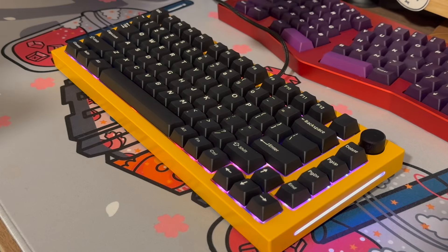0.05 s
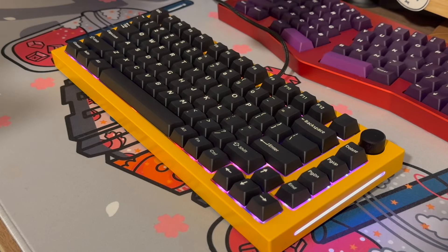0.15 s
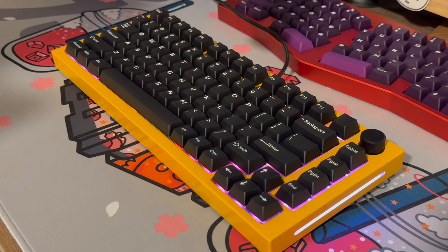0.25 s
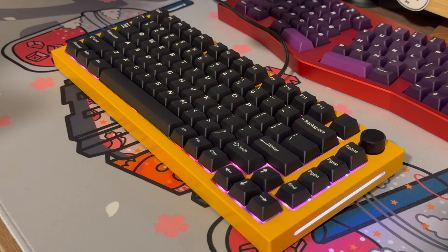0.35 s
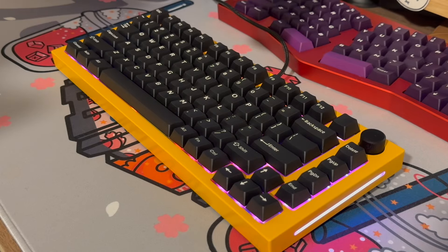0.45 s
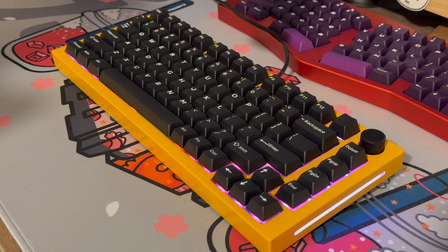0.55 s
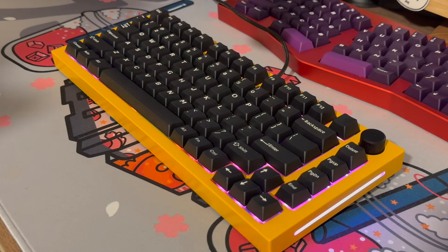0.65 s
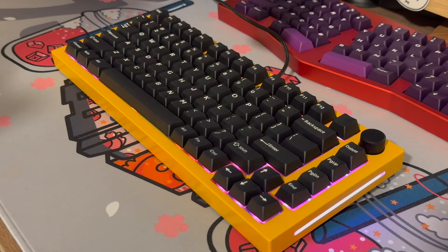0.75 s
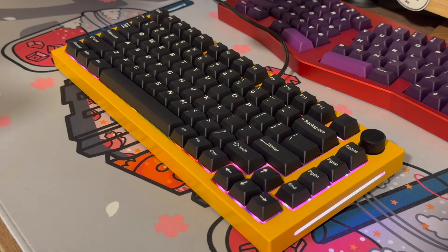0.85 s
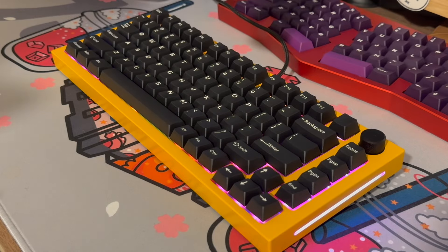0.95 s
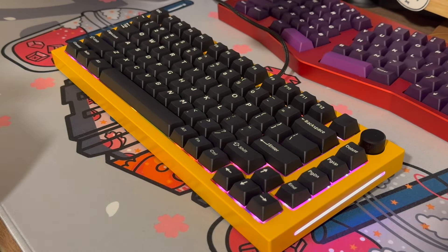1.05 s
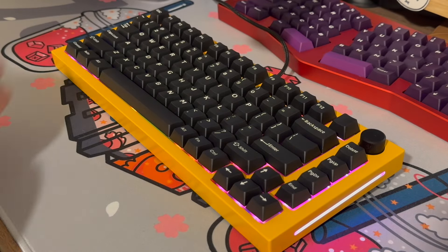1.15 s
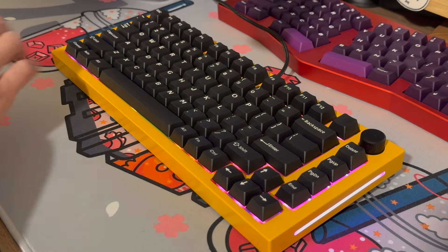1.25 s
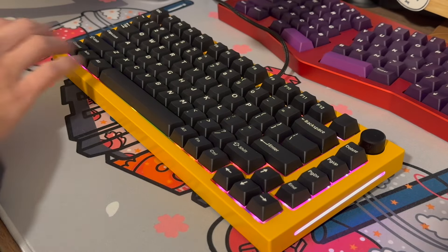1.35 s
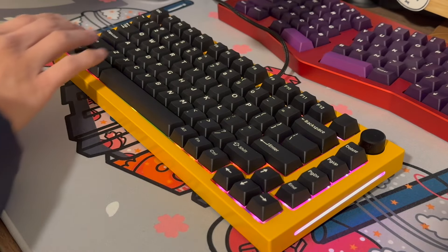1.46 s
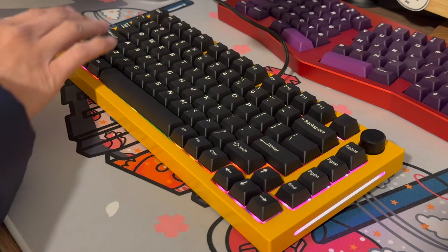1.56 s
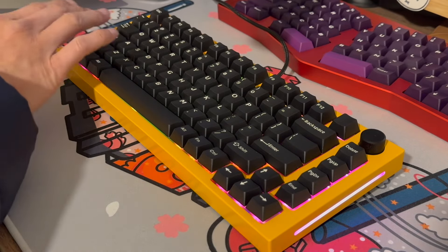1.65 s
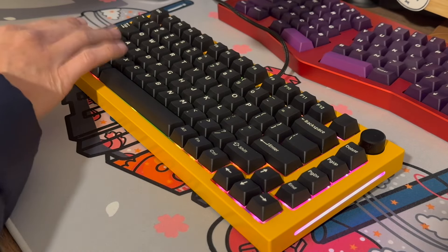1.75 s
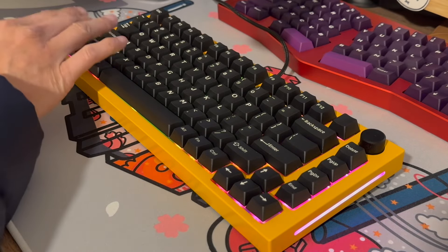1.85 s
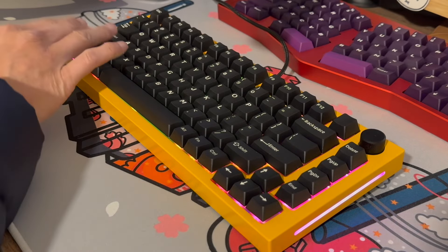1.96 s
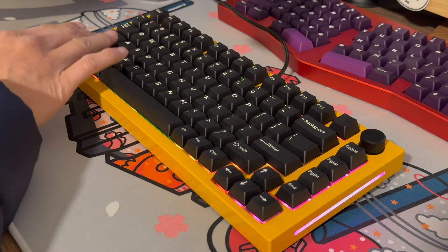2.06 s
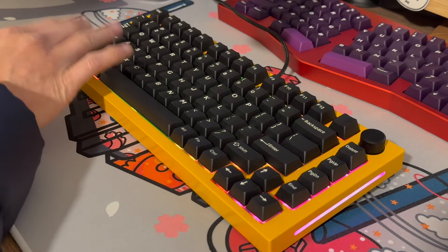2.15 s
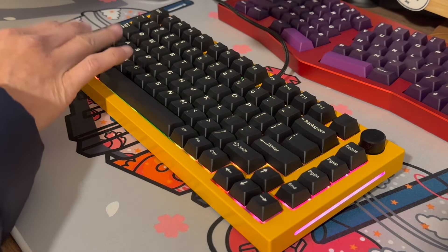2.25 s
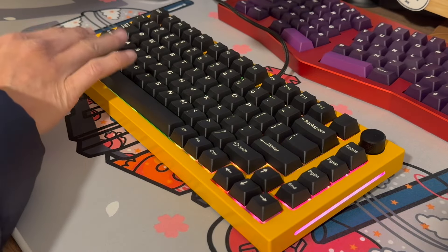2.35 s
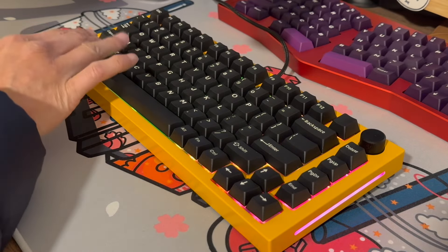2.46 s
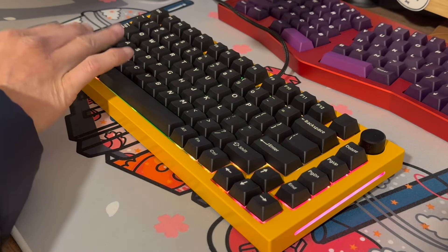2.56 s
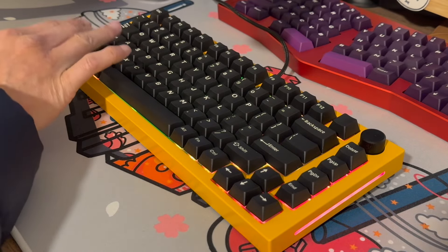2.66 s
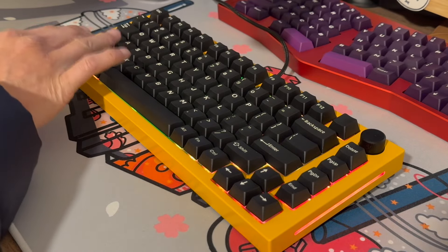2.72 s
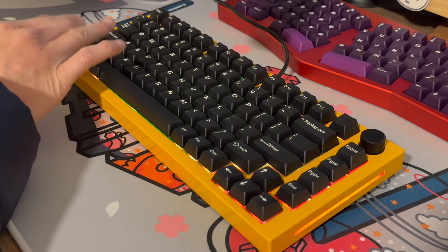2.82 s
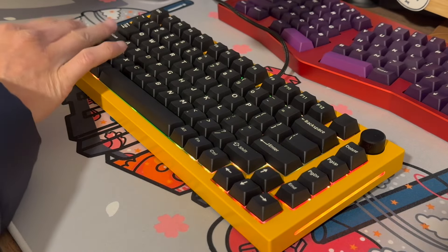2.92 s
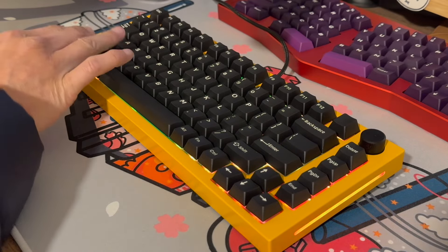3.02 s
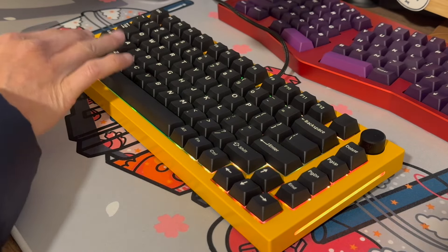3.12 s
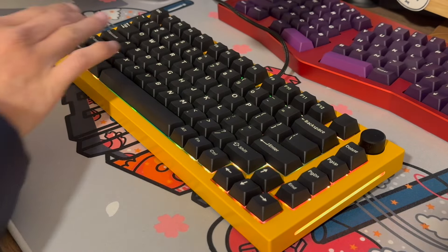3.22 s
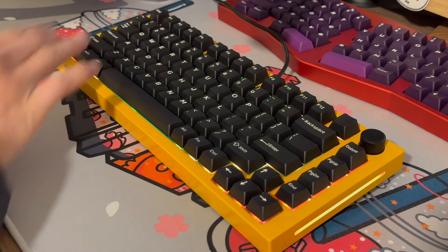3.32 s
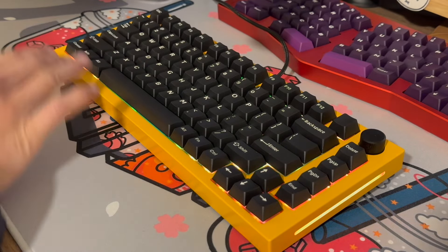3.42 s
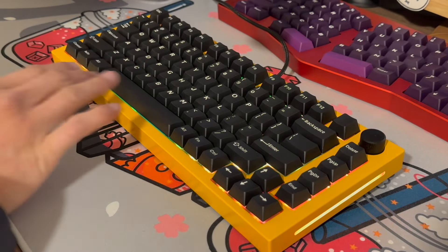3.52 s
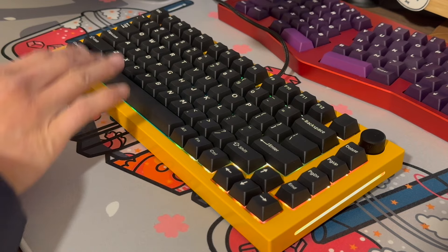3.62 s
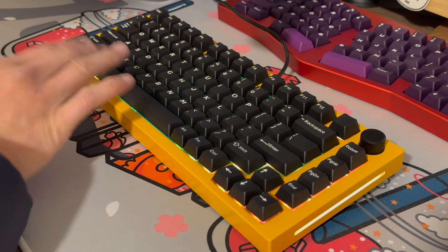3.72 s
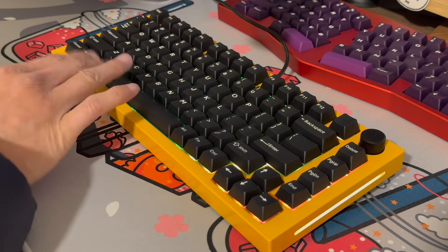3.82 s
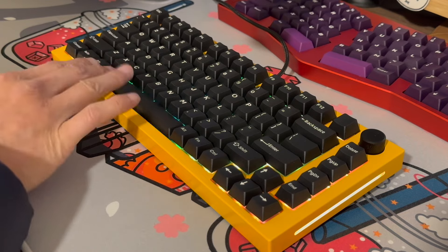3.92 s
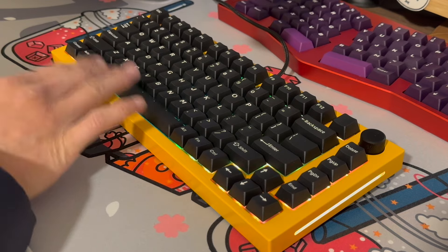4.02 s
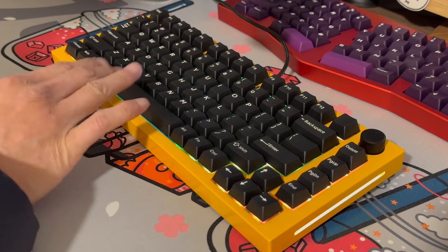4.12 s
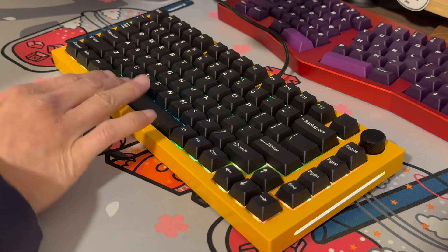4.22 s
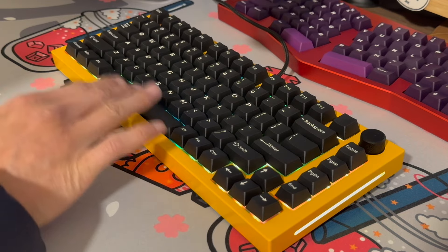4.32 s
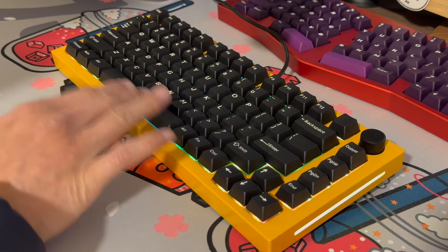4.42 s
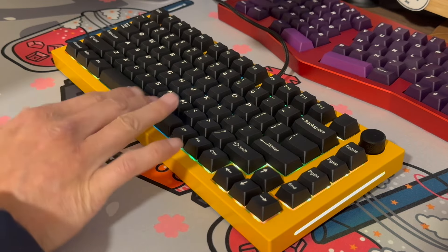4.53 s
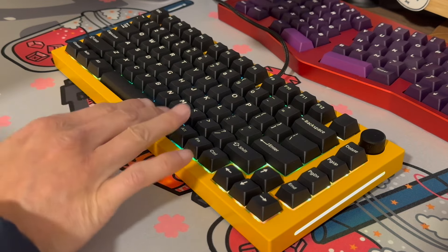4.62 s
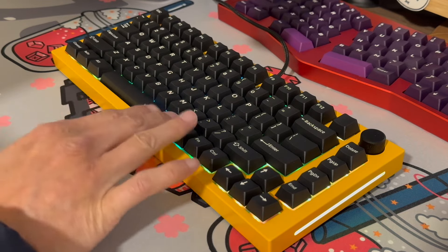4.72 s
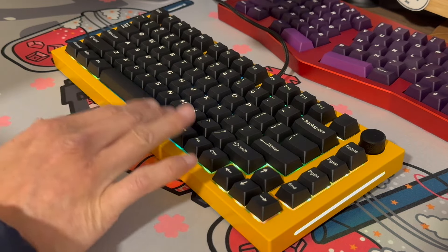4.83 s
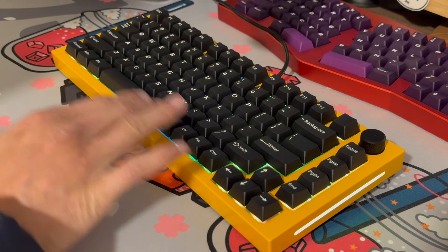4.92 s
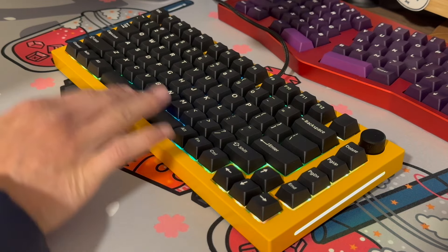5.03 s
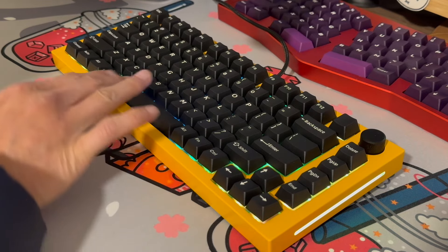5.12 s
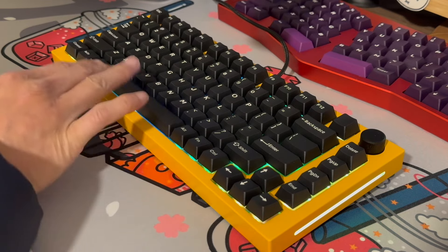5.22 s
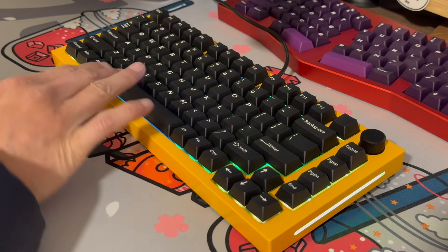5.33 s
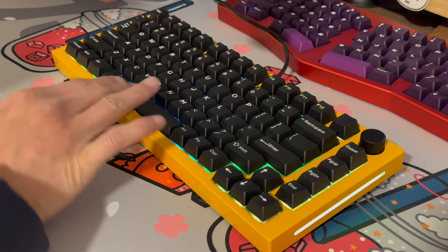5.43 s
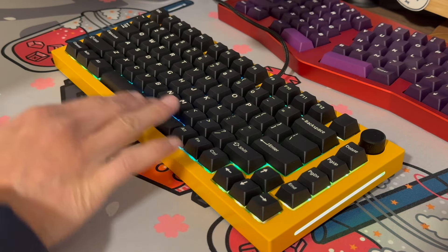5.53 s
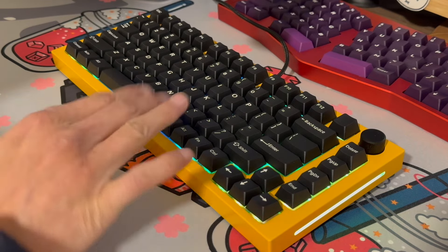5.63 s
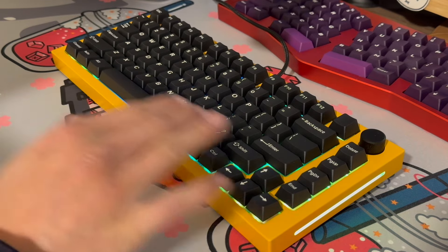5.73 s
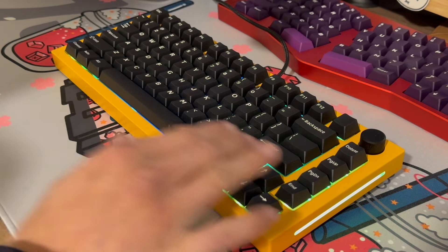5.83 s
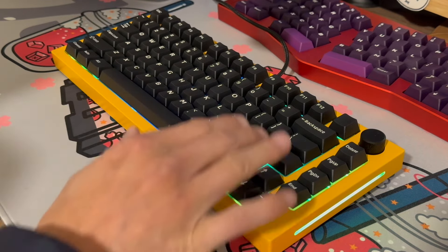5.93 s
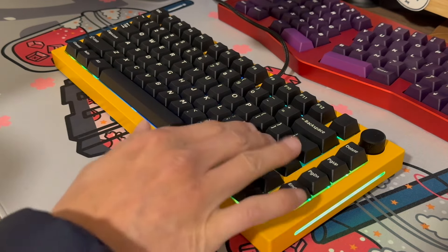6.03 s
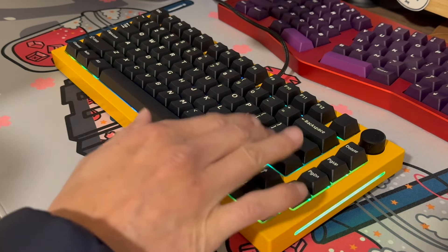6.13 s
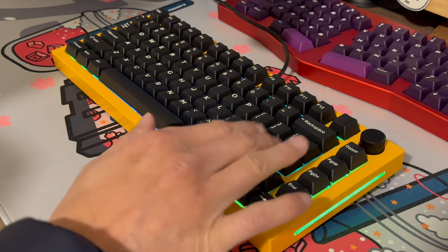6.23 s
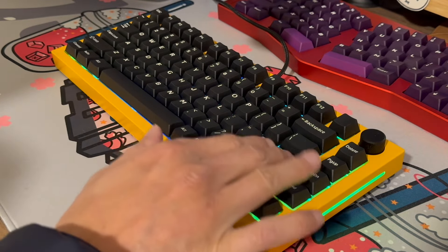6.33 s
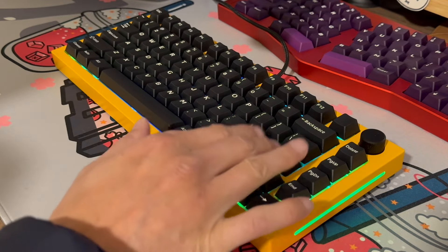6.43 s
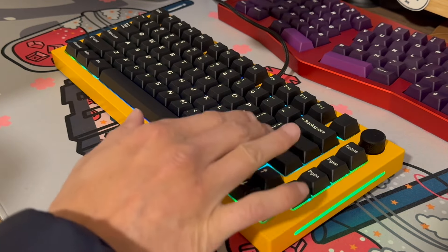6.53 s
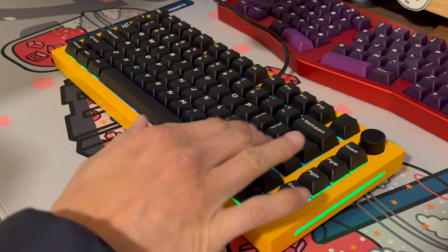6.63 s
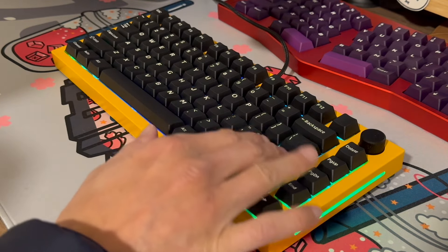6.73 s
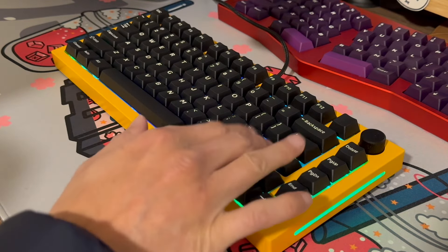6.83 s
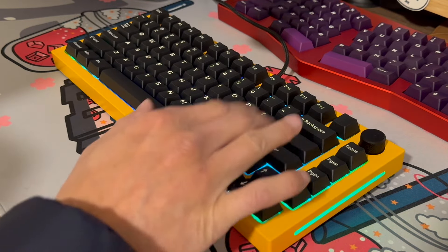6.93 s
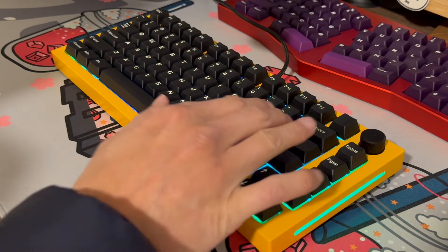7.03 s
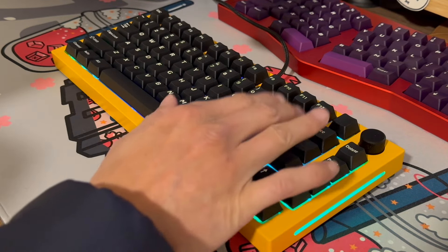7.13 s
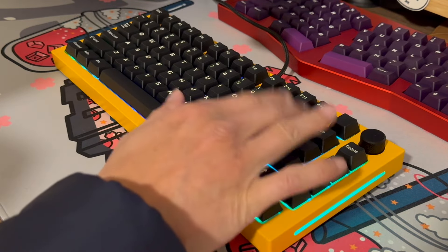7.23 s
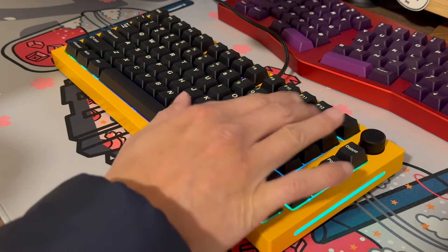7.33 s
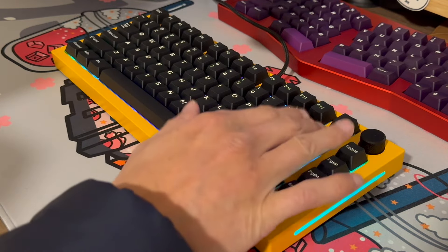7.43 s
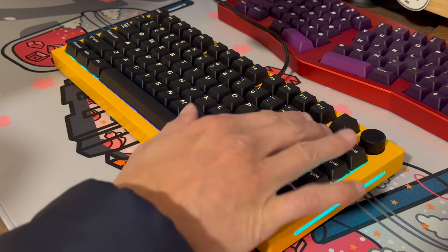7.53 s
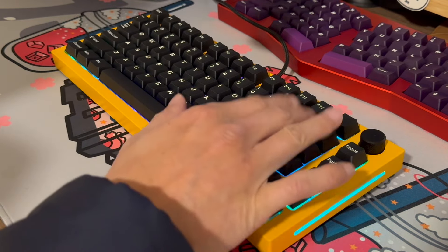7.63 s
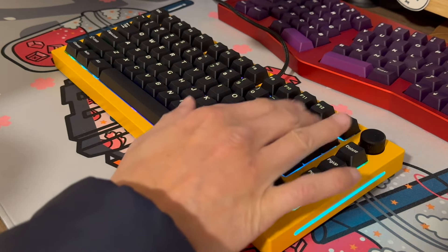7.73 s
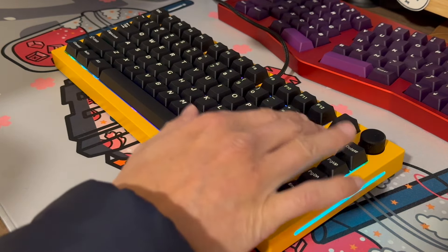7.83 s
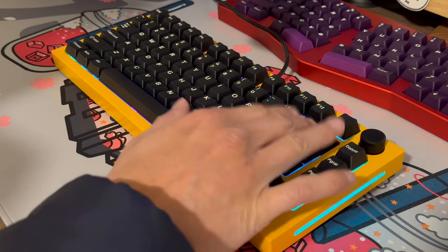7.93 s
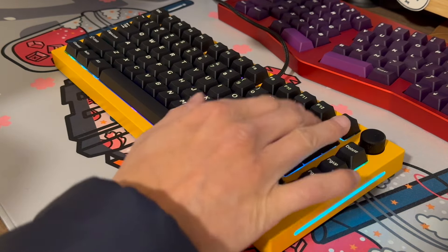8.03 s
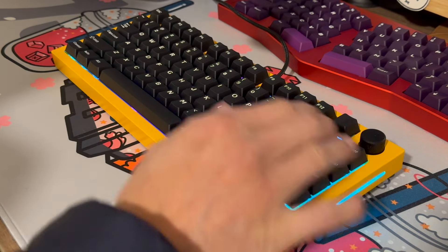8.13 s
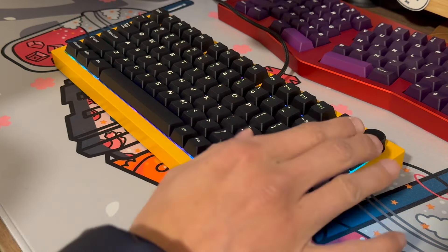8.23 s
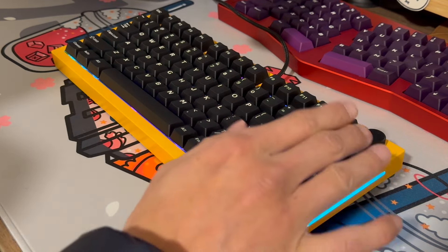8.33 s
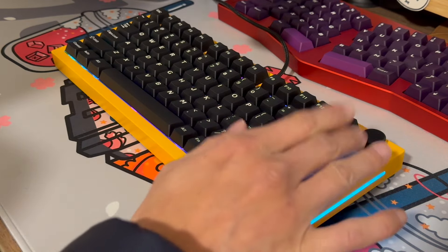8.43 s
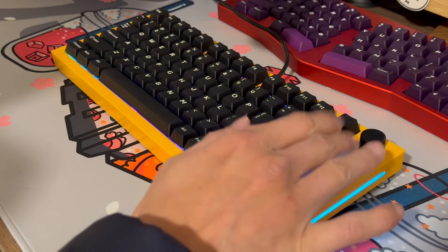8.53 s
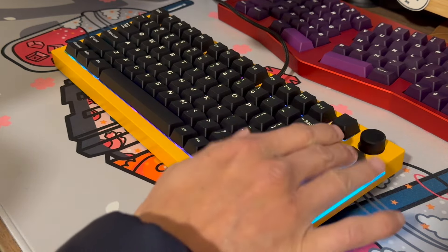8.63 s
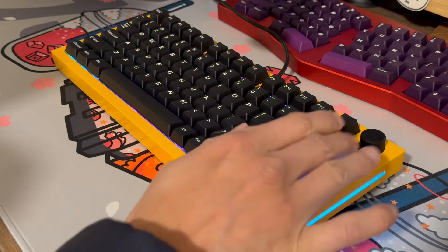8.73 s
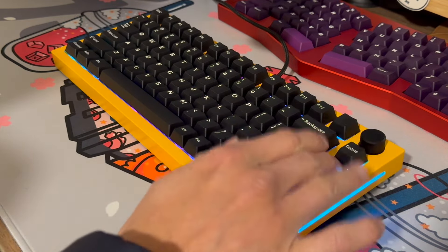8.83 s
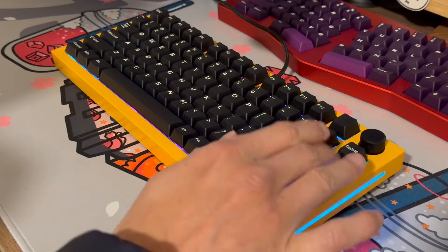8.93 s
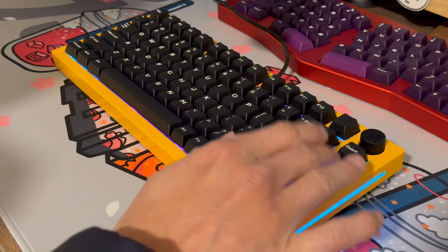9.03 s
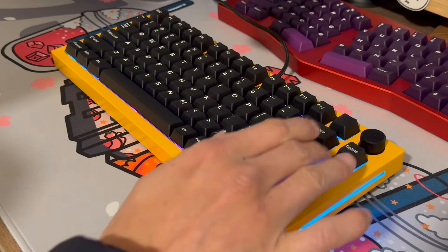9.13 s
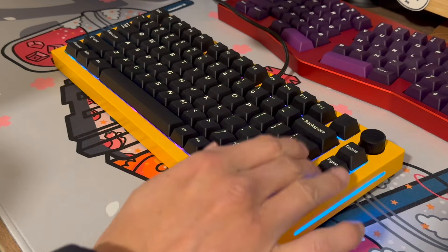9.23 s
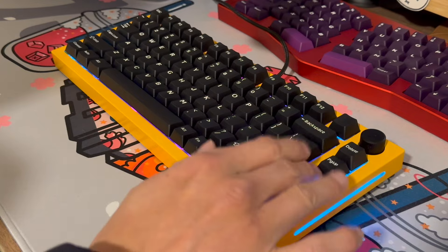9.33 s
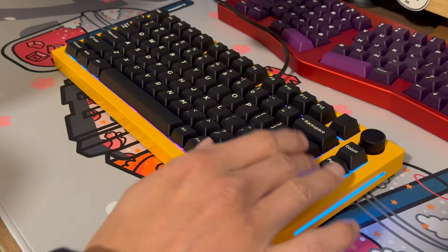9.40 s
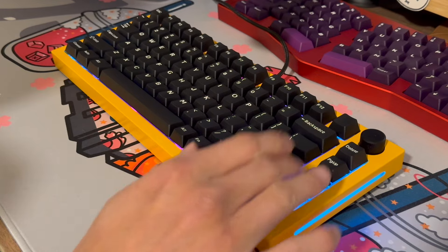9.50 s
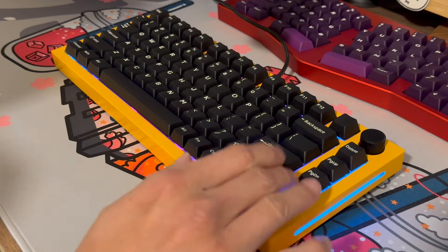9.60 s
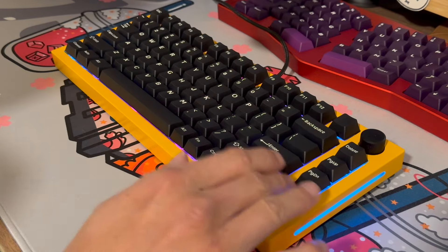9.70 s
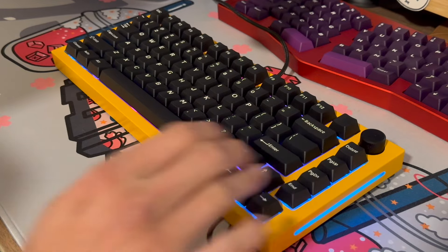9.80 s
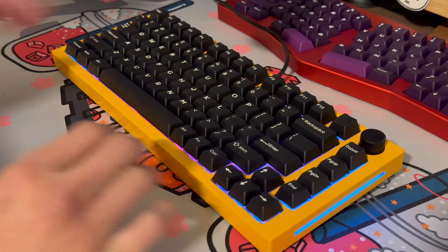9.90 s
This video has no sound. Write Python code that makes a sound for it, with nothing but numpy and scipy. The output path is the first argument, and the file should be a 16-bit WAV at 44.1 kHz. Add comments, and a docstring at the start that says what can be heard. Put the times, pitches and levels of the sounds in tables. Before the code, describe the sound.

Close mechanical keyboard clacks come in rapid runs, one key repeated at a time, with short pauses and a faint sleeve rustle.

```python
"""At a desk in a small, quiet room, one hand taps a mechanical keyboard in quick bursts, key by key:
a left-hand key, space bar, shift, enter, backspace and a small key. Each key clacks down on the plate
that holds it, then springs back against its top stop, and the desk booms faintly.
A sleeve rustles between bursts, and the room answers with a short flutter of echoes.
The microphone is close, so left and right sound almost the same."""
import sys
import numpy as np
from scipy import signal
from scipy.fft import rfft, irfft, next_fast_len
from scipy.io import wavfile
from scipy.ndimage import uniform_filter1d, map_coordinates

SR = 44100
rng = np.random.default_rng(int(sys.argv[2]) if len(sys.argv) > 2 else 0)


def unload_wav(signal):
    """Save mono or channel-first audio to the path in sys.argv[1] as 16-bit WAV at rate SR, clipped to [-1, 1]."""
    wavfile.write(
        sys.argv[1],
        SR,
        np.round(np.clip(np.atleast_2d(signal).T, -1, 1) * 32767).astype(np.int16),
    )


N = 439236
SIZE = 4096  # samples in one short sound, such as a clack
HZ, T = np.fft.rfftfreq(SIZE, 1 / SR), np.arange(SIZE) / SR  # its frequencies and times

# tone of three noises (room air, rubbing cloth, skin on a keycap): f/Hz, level/dB
AIR_TONE = [(15, -9), (30, -4), (45, -8.5), (60, -26.5), (80, -28.5), (110, -20.5), (260, -28.5),
            (500, -28.5), (950, -34.5), (1700, -42.5), (9000, -45), (13500, -46), (16000, -73)]
CLOTH_TONE = [(240, -34), (400, -3), (518, -5), (558, -6), (854, -1.5), (964, 1), (1390, -4), (4130, -6.5),
              (9090, -14.5), (15000, -26.5)]
SKIN_TONE = [(500, -19.5), (2000, -10), (4000, -6), (5500, 4.5), (6800, -11.5), (8600, -6), (10200, -2),
             (12000, -12.5), (16000, -29)]
# echoes from hard surfaces nearby: delay/s, level/dB
NEAR_ECHOES = [(0.0122, -27), (0.0126, -35.5), (0.0156, -45), (0.02, -41.5), (0.0242, -39), (0.0333, -41),
               (0.036, -39)]
# how long the room rings (t60 is the time to fade by 60 dB): f/Hz, t60/s
ROOM_DECAY = [(150, 0.33), (1000, 0.42), (3000, 0.37), (6000, 0.3), (14000, 0.54)]
# tone of the room's answer: f/Hz, level/dB
WALL_TONE = [(120, 0), (350, 7), (800, 4), (1300, -0.5), (2200, -1.5), (3200, 1), (4200, 4), (6000, 3),
             (12000, 0)]
# the sleeve brushing along as the hand moves: peak t/s, level/dB, rise/s, fall/s
SLEEVE_BRUSHES = [(.68, -72, 0.16, .4), (1.05, -66.5, 0.32, 0.29), (1.5, -66.5, 0.19, 0.19),
                  (3.37, -66.5, 0.047, 0.15), (4.1, -69, 0.31, 1), (5.87, -70.5, .3, 1.4),
                  (7.08, -73, 0.22, 1.3), (8.12, -64, 0.16, 0.1), (9.86, -66.5, 0.26, .4)]
# soft knocks of arm and fingers on desk and case: t/s, level/dB, f/Hz, t60/s
ARM_KNOCKS = [(1.233, -47, 176, 0.1), (1.52, -44, 1800, .006), (1.549, -42, 2390, 0.0051),
              (3.551, -35, 620, 0.0056), (5.789, -62, 260, 0.091)]
# low notes of desk and case: f/Hz, t60/s, then one level/dB for each key in KEYS
DESK_NOTES = [(26, 0.4, -57.5, -66.5, -57.5, -54, -53, -51), (36.2, 1.0, -57, -56, -54, -52, -50.5, -61),
              (70.9, 0.71, -55.5, -54, -60, -59, -67.5, -64),
              (108.1, .65, -72, -72.5, -66, -66.5, -64.5, -60.5),
              (138, 0.084, -67, -52.5, -75, -66, -76, -76),
              (251.3, 0.076, -65, -47.5, -56, -55, -69.5, -68)]
# fingers skidding along the space bar: start t/s, end t/s, level/dB
SPACE_SKIDS = [(4.93, 5.015, -63), (5.062, 5.143, -63), (5.304, 5.403, -62.5), (5.431, 5.537, -61)]
# broad tone of each key: f/Hz, press level/dB, release level/dB
LEFT_BODY = [(130, -16, -11.5), (260, -25, -18), (410, -46, -29), (843, -26, -21), (1264, -2, -0.5),
             (2205, -1, 0), (3290, -13, -3.5), (6330, -25, -19.5), (10300, -38.5, -30),
             (15500, -63.5, -54.5)]
SPACE_BODY = [(130, -17.5, -38), (260, -15.5, -17.5), (400, -21, -20), (778, -20.5, -8),
              (1362, -13.5, -13.5), (2285, 1, 0), (3686, -14, -19), (6890, -34.5, -38.5),
              (10480, -46.5, -36.5), (15200, -63, -66.5)]
SHIFT_BODY = [(130, -25, -30), (260, -36.5, -35), (372, -32, -40), (852, -14.5, -23.5), (1284, -1.5, -25),
              (2246, -5.5, 3), (3440, -25, -26.5), (6450, -35.5, -31.5), (10100, -39.5, -43.5),
              (15400, -69, -63.5)]
ENTER_BODY = [(143, -9.5, -10), (260, -21.5, -7), (356, -26.5, -15.5), (790, -8, -6), (1310, -1, 1.5),
              (2030, 3, -3.5), (3550, -7, -4.5), (6830, -29.5, -26.5), (10100, -28.5, -25.5),
              (15300, -64, -57)]
BACKSPACE_BODY = [(131, -9.5, -44), (260, -27, -34), (397, -26, -24), (800, -14, -17.5), (1320, 1.5, -6.5),
                  (2140, 2.5, 0), (3440, -3.5, -19), (6460, -17.5, -34.5), (10100, -23, -30),
                  (15700, -52, -68)]
SMALL_BODY = [(131, -20, -21), (260, -34, -36), (410, -33.5, -31), (790, -24.5, -2), (1290, -16.5, 1),
              (2300, -1, -6), (3520, -5, -26), (6440, -32, -27.5), (9900, -35.5, -42), (15500, -63, -59)]
# pitches that cap and plate boost (+) or weaken (-): f/Hz, width/Hz, press level/dB, release level/dB
LEFT_MODES = [(440, 132, 20, 15), (566, 253, 16.5, -2), (740, 258, 6.5, 18.5), (1220, 47, -4, -20),
              (2084, 390, -0.5, 5.5), (2938, 1000, 4.5, -9), (4460, 314, 3.5, -3.5), (5610, 900, 2, 7)]
SPACE_MODES = [(761, 100, 5, -28.5), (1470, 100, -23.5, 5), (1720, 250, -2, 4.5), (2400, 770, -11, -15),
               (2700, 290, 3, -2), (4330, 490, 3, -5.5), (4950, 390, -6, -3), (5410, 230, 13.5, 3.5),
               (6670, 230, -15, -2.5)]
SHIFT_MODES = [(1226, 210, -4.5, 13.5), (1303, 340, -13, -3.5), (2200, 260, 0.5, -13.5),
               (2475, 550, -14.5, -10.5), (3300, 650, 14, 7), (5180, 1000, 8, 0.5), (6330, 380, 12.5, 2),
               (10257, 890, -9, 11.5)]
ENTER_MODES = [(315, 56, -11, -3), (533, 47, -18.5, -3.5), (1045, 110, 1, 9.5), (1104, 83, -10.5, -32),
               (1890, 120, -4.5, 7), (2130, 130, 3, -1.5), (2930, 260, 3, -2.5), (5000, 870, 0.5, 13),
               (6970, 500, 12, 11.5), (7560, 240, 11, -8)]
BACKSPACE_MODES = [(720, 34, -24, -14), (1536, 76, -6.5, -7), (1760, 190, -1.5, -6), (2830, 490, 6, -2.5),
                   (3180, 300, 2.5, 6.5), (5730, 290, -9.5, -6), (7720, 1500, -6.5, -9),
                   (10200, 900, -4, -14)]
SMALL_MODES = [(794, 74, -13, -24), (910, 65, -12, -9), (1270, 200, 6.5, -6.5), (2600, 850, -13.5, 6),
               (3210, 170, 2.5, -14), (3400, 200, 0, 15), (3730, 700, -10.5, 8), (5570, 640, -15, -4)]
# the six keys in playing order (left, space, shift, enter, backspace, small): body table, modes table
KEYS = [(LEFT_BODY, LEFT_MODES), (SPACE_BODY, SPACE_MODES), (SHIFT_BODY, SHIFT_MODES),
        (ENTER_BODY, ENTER_MODES), (BACKSPACE_BODY, BACKSPACE_MODES), (SMALL_BODY, SMALL_MODES)]
# when the hand moves on to the next key: t/s
NEXT_KEY_TIMES = [3.4, 5.8, 7.05, 8.2, 9.42]
# how the finger meets each key at its usual force:
# press treble/dB, press bass/dB, release treble/dB, release bass/dB, fingertip tap level/dB
KEY_TOUCH = [(-4, -1.9, .4, -0.5, -35.5), (0.2, -0.6, 2, -2, -31.5), (-1.5, 4, -4.5, 2.2, -22.5),
             (2.5, 2.7, -3, -3.8, -20.5), (-0.6, -1, -0.5, -5.5, -20.5), (-2.5, -2, 0.5, 1, -30)]
# keystrokes, about seven a second in bursts: press t/s, level/dB, release t/s, level/dB
KEYSTROKES = [(1.7389, 0, 1.8109, -10), (1.8914, 0, 1.9645, -13), (2.0323, 0.1, 2.098, -12),
              (2.1706, .7, 2.2493, -14.5), (2.3152, -2, 2.3815, -15.5), (2.434, -2.5, 2.5128, -22),
              (2.568, -4.5, 2.6316, -16), (2.6955, -1, 2.7768, -14), (2.847, -1.5, 2.9193, -17),
              (2.992, -6, 3.0473, -20), (3.085, -0.5, 3.1449, -9), (3.7197, 2.5, 3.7915, -3.5),
              (3.861, -0.1, 3.9306, -2.5), (3.9953, 0, 4.07, -4), (4.1403, -1.1, 4.2102, -8.5),
              (4.284, -2, 4.3489, -4.5), (4.4104, -2, 4.4814, -7), (4.5467, -2, 4.6167, -11.5),
              (4.661, -2.5, 4.7393, -7), (4.8017, .5, 4.877, -5), (4.948, 0.2, 5.0227, -11.5),
              (5.0886, -2.5, 5.1535, -8), (5.2101, -3.5, 5.274, -7.5), (5.331, -2.5, 5.4038, -7),
              (5.4559, -2.8, 5.5443, -5), (5.9754, 1.5, 6.0448, -6.5), (6.1157, -2, 6.1764, -2.5),
              (6.2486, -0.5, 6.3202, -7.5), (6.4, -3.5, 6.4556, -1.5), (6.5337, -3, 6.5984, -12),
              (6.6527, -1.3, 6.7152, -3.5), (6.7902, -2.5, 6.8604, -5.5), (7.2054, 0.5, 7.2651, -6),
              (7.339, -1.5, 7.4054, -10.5), (7.4698, -1.5, 7.5369, -9), (7.6124, -2.5, 7.6806, -8.5),
              (7.7448, -1.3, 7.8146, -11), (7.888, -1.5, 7.9716, -14), (8.4145, 4.5, 8.473, -8.5),
              (8.545, 0, 8.6169, -8), (8.7864, -.5, 8.8524, -3), (8.916, -2.5, 8.9813, -2.5),
              (9.1414, .8, 9.204, -2), (9.2843, 0, 9.341, -4.5), (9.4889, -0.5, 9.5468, -11),
              (9.6042, -3, 9.6679, -9)]
# the space bar bouncing once more on its top stop: t/s, level/dB
SPACE_BOUNCES = [(3.7971, -13.5), (3.934, -16), (4.0753, -15), (4.216, -9.5), (4.353, -24)]


def amp(db):
    """Turn decibels into a factor to multiply by."""
    return 10 ** (np.asarray(db) / 20)


def along(points, hz):
    """Read a curve of (frequency, value) points at hz, on a log frequency scale."""
    freqs, values = np.transpose(points)
    return np.interp(np.log(hz + 1), np.log(freqs + 1), values)


def fade(t, t60):
    """Die away by 60 dB every t60 seconds."""
    return np.exp(-np.log(1000) * t / t60)


def add(track, s, x):
    """Mix x into the track, starting at s seconds."""
    part = track[round(s * SR):][:len(x)]
    part += x[:len(part)]


def wobble(rate):
    """A smooth curve through `rate` random points a second."""
    return map_coordinates(rng.standard_normal(int(N * rate / SR) + 4), [np.arange(N) * rate / SR])


def filtered(x, response):
    """Multiply each frequency in x by response(hz)."""
    size = next_fast_len(N + SR // 2)
    return irfft(rfft(x, size) * response(np.fft.rfftfreq(size, 1 / SR)), size)[..., :N]


def noise(tone):
    """Steady noise with the given tone and an average strength (rms) of 1."""
    x = filtered(rng.standard_normal(N), lambda hz: amp(along(tone, hz)))
    return x / np.sqrt(np.mean(x ** 2) + 1e-20)


def chatter(t60):
    """Many tiny hits dying away, with a total energy of 1."""
    x = rng.standard_normal(SIZE) * fade(T, t60)
    return x / np.linalg.norm(x)


def struck(tone_db, force):
    """The sound, with energy 1, of an object with this tone when a force hits it."""
    # fold the cepstrum so that the ringing follows the hit (minimum phase)
    cepstrum = irfft(np.log(amp(tone_db)))
    cepstrum[1:SIZE // 2] *= 2
    cepstrum[SIZE // 2:] = 0
    x = irfft(np.exp(rfft(cepstrum)) * rfft(force))
    return x / np.linalg.norm(x)


def key_at(s):
    """The number of the key in use at s seconds."""
    return np.searchsorted(NEXT_KEY_TIMES, s)


def key_tone(s, rising):
    """Tone in dB of the key in use at s seconds, going down or coming up."""
    body, modes = KEYS[key_at(s)]
    tone = along([(hz, up if rising else down) for hz, down, up in body], HZ)
    for hz, width, down, up in modes:
        tone += (up if rising else down) / (1 + (2 * (HZ - hz) / width) ** 2)
    return tone - 10 * np.log10(1 + (85 / (HZ + 1)) ** 4)  # a small case gives off little deep bass


def strokes():
    """Each stroke, its key's touch, and the dB by which press and release top that key's average."""
    down_s, down_db, _, up_db = np.transpose(KEYSTROKES)
    key = key_at(down_s)
    extra_db = [db - (np.bincount(key, db) / np.bincount(key))[key] for db in (down_db, up_db)]
    return zip(KEYSTROKES, [KEY_TOUCH[k] for k in key], *extra_db)


def room_air():
    """The quiet room rumbles and hisses, its level drifting a little."""
    return amp(-65.5 + 0.98 * wobble(3.3)) * noise(AIR_TONE)


def room_echoes(x, tail_db, build_s, grain_db):
    """The walls send back a few echoes and a grainy tail that is new for every stroke."""
    out = np.zeros(N)
    edges = [0] + [round((row[0] - 0.02) * SR) for row in KEYSTROKES[1:]] + [N]
    for start, end in zip(edges, edges[1:]):
        hz, t, bands = signal.stft(rng.standard_normal(SR // 2), SR, nperseg=128)
        shape = fade(t, along(ROOM_DECAY, hz)[:, None]) * (1 - np.exp(-t / build_s))
        grain = amp(grain_db * rng.standard_normal(len(t)))
        tail = signal.istft(bands * shape * grain, SR, nperseg=128)[1]
        tail *= amp(tail_db) / np.linalg.norm(tail)
        for delay, db in NEAR_ECHOES:
            add(tail, delay, amp(db) * chatter(t60=0.0045))
        add(out, start / SR, signal.fftconvolve(x[start:end], tail))
    return filtered(out, lambda hz: amp(along(WALL_TONE, hz)))


def sleeve(rest_db, drop_db, folds_db):
    """Cloth rustles with each move of the hand, drop_db quieter one rise or fall time from the peak."""
    t = np.arange(N) / SR
    power = amp(rest_db) ** 2  # even a resting arm stirs faintly
    for s, db, rise, fall in SLEEVE_BRUSHES:
        from_peak = np.maximum((s - t) / rise, (t - s) / fall)
        power = power + amp(db - drop_db * from_peak) ** 2
    return np.sqrt(power) * amp(folds_db * wobble(70)) * noise(CLOTH_TONE)


def arm_knocks():
    """Arm and fingers bump the desk and case, and each bump rings briefly at one pitch."""
    out, t = np.zeros(N), np.arange(SR // 2) / SR
    for s, db, hz, t60 in ARM_KNOCKS:
        soft_start = 1 - np.exp(-t * hz / 2)
        add(out, s, amp(db) * np.sin(2 * np.pi * hz * t) * fade(t, t60) * soft_start)
    return out


def desk_boom(release_db):
    """Every press pushes the desk, which sways at its low notes; a release pulls the other way."""
    out, t = np.zeros(N), np.arange(SR) / SR
    rings = [(np.sin(2 * np.pi * hz * t) * fade(t, t60), levels) for hz, t60, *levels in DESK_NOTES]
    for down_s, _, up_s, _ in KEYSTROKES:
        key = key_at(down_s)
        for s, push in ((down_s, 1), (up_s, -amp(release_db))):
            boom = sum(amp(levels[key] + rng.normal(0, 3.8)) * ring for ring, levels in rings)
            add(out, s, push * boom)
    return out


def skin_hiss(hold_db, lead_s, grain_db):
    """Skin hisses faintly while the finger is on a keycap, and louder where it skids."""
    level = np.zeros(N)
    holds = [(down_s - lead_s, up_s - lead_s / 2, hold_db) for down_s, _, up_s, _ in KEYSTROKES]
    for start, end, db in holds + SPACE_SKIDS:
        level[round(start * SR):round(end * SR)] = amp(db)
    return uniform_filter1d(level, size=800) * amp(grain_db * wobble(400)) * noise(SKIN_TONE)


def tap_and_rub(rub_db, travel_s, lead_s, tap_slope, soften_s, bright_db):
    """The fingertip taps the cap and the stem under it rubs its housing; faster is louder and shorter."""
    out = np.zeros(N)
    treble = HZ ** 4 / (HZ ** 4 + 2500 ** 4)
    for (s, db, _, _), (*_, tap_db), extra_db, _ in strokes():
        tone = key_tone(s, rising=False) + bright_db * treble
        speed = amp(db)
        tap_force = chatter(t60=0.018) * (1 - np.exp(-T / soften_s))
        add(out, s - lead_s / speed, amp(db + tap_db + tap_slope * extra_db) * struck(tone, tap_force))
        rub_force = rng.standard_normal(SIZE) * T * (T < travel_s / speed)
        add(out, s - travel_s / speed, amp(db + rub_db) * struck(tone, rub_force))
    return out


def plate_paths(spread_s, bass_lag_s):
    """A filter for the trip through the plate: each pitch comes a bit late, and low waves are slowest."""
    scatter = map_coordinates(rng.standard_normal(40), [HZ / 700]) ** 2
    lag = spread_s * scatter * HZ / (HZ + 5000) + bass_lag_s / (1 + (HZ / 1000) ** 4)
    return np.exp(-2j * np.pi * (np.cumsum(lag) - lag[0]) * HZ[1])


def clack(s, rising, treble_db, bass_db, paths, rattle, rattle_t60=0.015):
    """The key's stem hits its stop and the loose cap rattles. The hit sits midway through the result."""
    treble = np.clip(np.log((HZ + 1) / 2000) / np.log(3), 0, 1)
    bass = np.clip(np.log(1500 / (HZ + 1)) / np.log(3), 0, 1)
    force = (T == 0) + rattle * chatter(rattle_t60)
    hit = struck(key_tone(s, rising) + treble_db * treble + bass_db * bass, force)
    through_plate = irfft(rfft(hit) * paths[key_at(s)])
    return np.roll(through_plate, SIZE // 2) * np.hanning(SIZE)


def key_clacks():
    """A pressed key lands cleanly because the finger holds it; a released key rattles more."""
    out, middle_s = np.zeros(N), T[SIZE // 2]
    down_paths = [plate_paths(spread_s=0.0007, bass_lag_s=0.00085) for _ in KEYS]
    up_paths = [plate_paths(spread_s=0.0011, bass_lag_s=0.0012) for _ in KEYS]
    for (s, db, up_s, up_db), touch, harder_db, freer_db in strokes():
        treble, bass, up_treble, up_bass, _ = touch
        # a harder press is brighter
        press = clack(s, False, treble + 1.2 * harder_db, bass + 0.25 * harder_db,
                      down_paths, rattle=0.27)
        # a freer release rings mostly at the cap's middle pitches
        release = clack(up_s, True, up_treble - 0.26 * freer_db, up_bass - 0.76 * freer_db,
                        up_paths, rattle=0.84)
        add(out, s - middle_s, amp(db) * press)
        add(out, up_s - middle_s, amp(up_db) * release)
    for s, db in SPACE_BOUNCES:
        add(out, s - middle_s, amp(db) * clack(s, True, 0, 0, up_paths, rattle=1.0, rattle_t60=0.011))
    return out


def scene():
    """Keyboard, desk, arm and room reach both sides of the microphone almost at once."""
    keyboard = key_clacks()
    keyboard += tap_and_rub(rub_db=-34, travel_s=0.014, lead_s=0.011, tap_slope=1.3,
                            soften_s=0.0015, bright_db=1.5)
    keyboard += skin_hiss(hold_db=-78.5, lead_s=0.021, grain_db=2)
    room = room_echoes(keyboard, tail_db=-23.5, build_s=0.014, grain_db=2) + room_air()
    desk = desk_boom(release_db=-5.5)
    arm = sleeve(rest_db=-84.5, drop_db=12.5, folds_db=1.3) + arm_knocks()
    # faint low microphone noise, opposite in left and right
    mic_noise = amp(-93) * noise([(30, 1), (200, -8.5), (2000, -23.5), (14000, -28.5)])
    early_s = np.array([[1.3e-6], [-1.3e-6]])  # left, right
    stereo = filtered(keyboard + room + desk + arm, lambda hz: np.exp(2j * np.pi * hz * early_s))
    return stereo + np.array([mic_noise, -mic_noise])


def record(dry):
    """Cut away the very highest treble, above 16200 Hz."""
    return filtered(dry, lambda hz: 1 / (1 + (hz / 16200) ** 120))


dry = scene()
out = record(dry)
unload_wav(out)
```